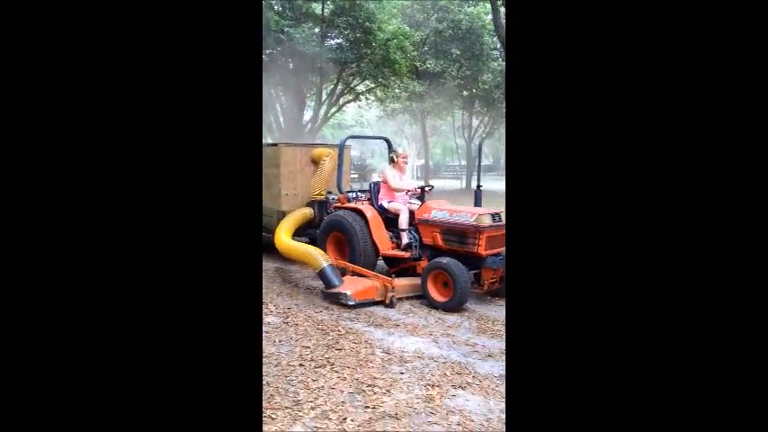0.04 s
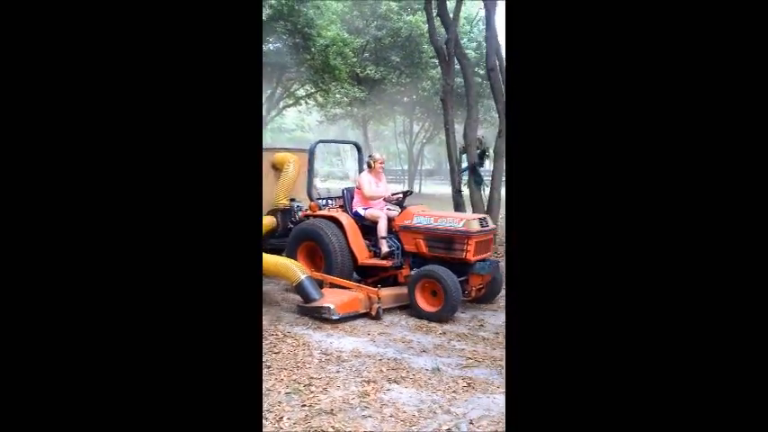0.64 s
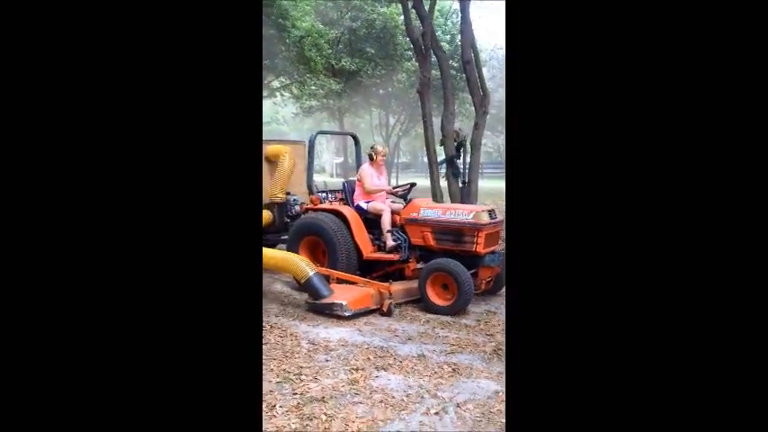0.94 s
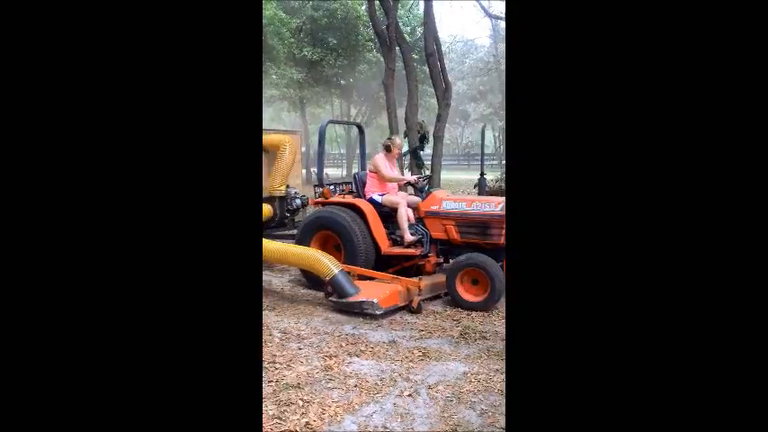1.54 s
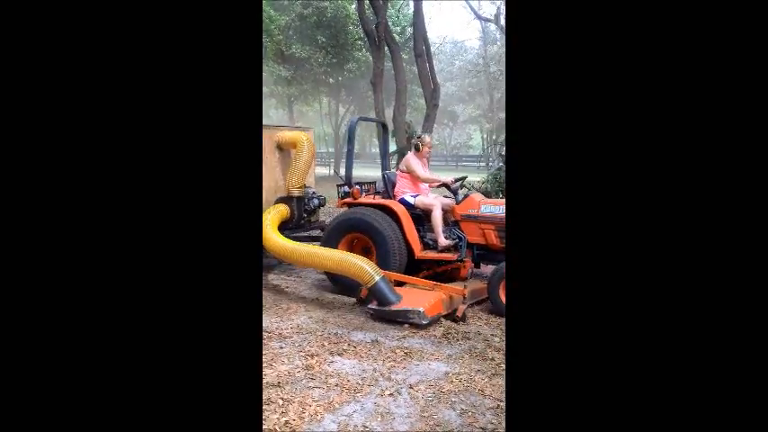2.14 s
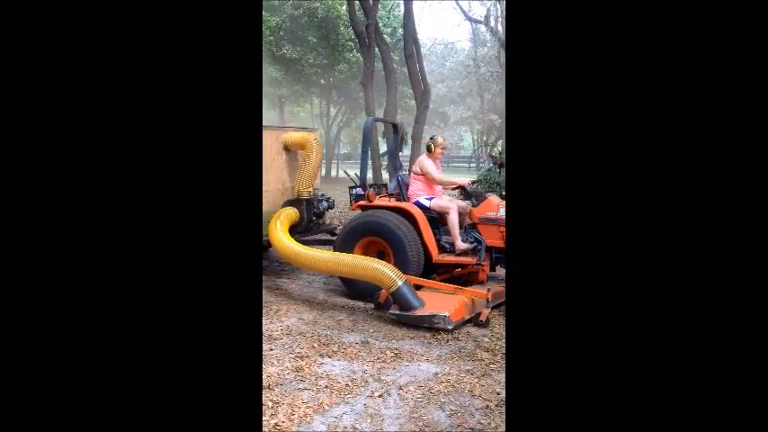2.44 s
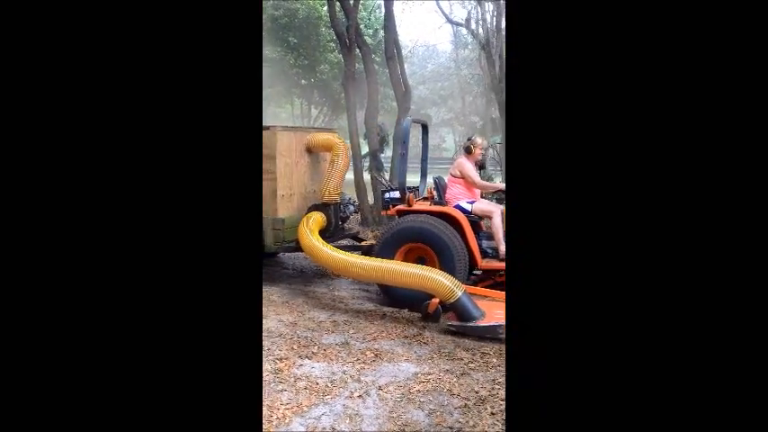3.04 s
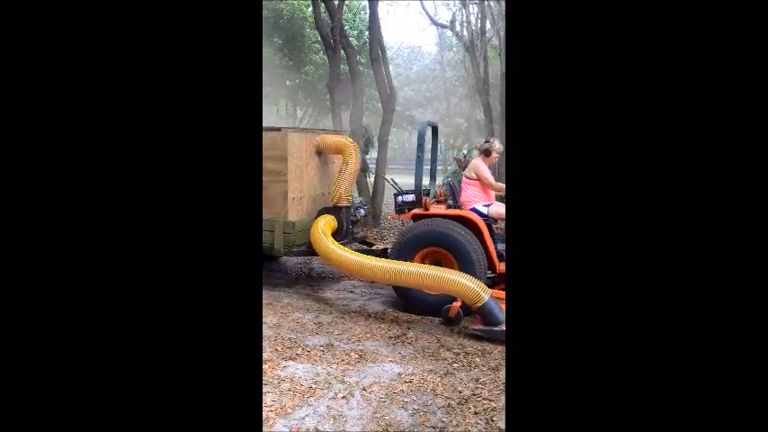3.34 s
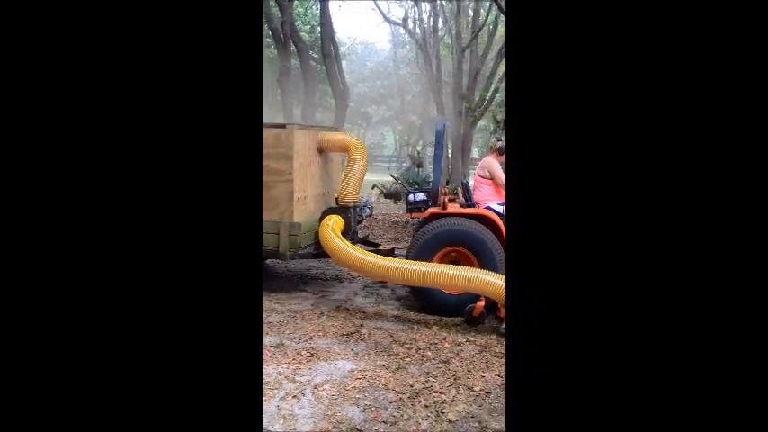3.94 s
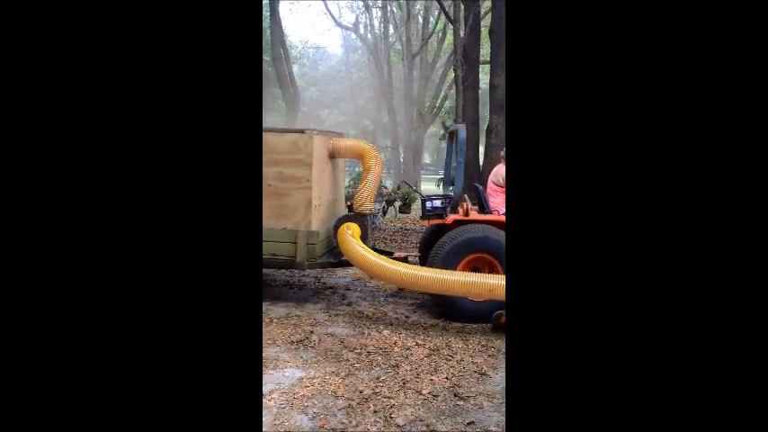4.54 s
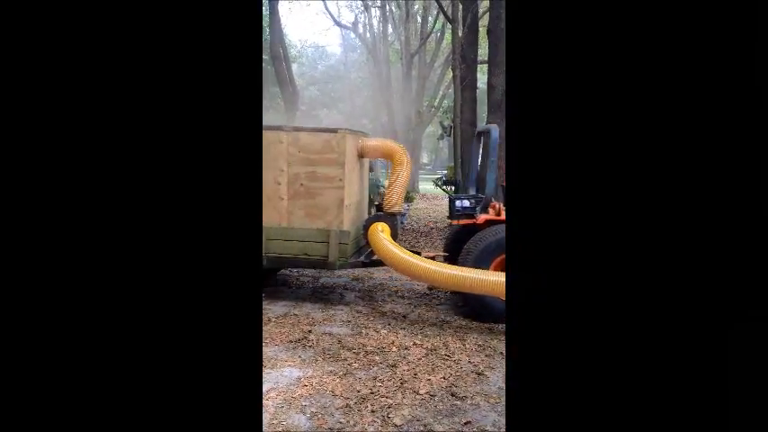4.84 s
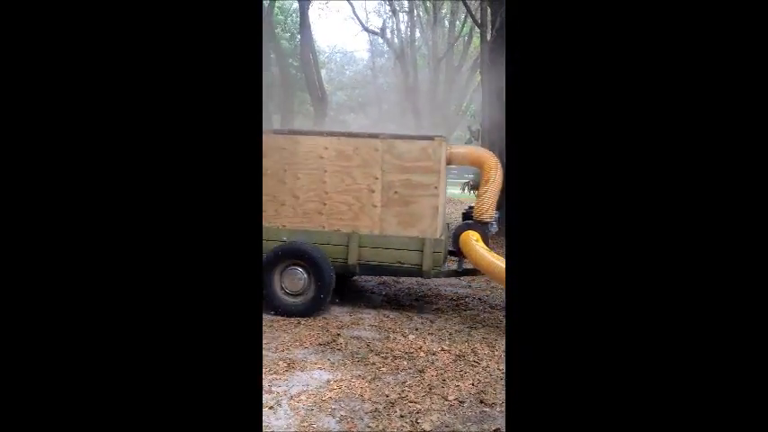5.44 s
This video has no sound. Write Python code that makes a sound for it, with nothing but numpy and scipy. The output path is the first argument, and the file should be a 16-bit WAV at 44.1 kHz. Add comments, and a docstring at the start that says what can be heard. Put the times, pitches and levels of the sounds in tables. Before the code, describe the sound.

From the start a leaf vacuum towed by a slow diesel tractor gives a loud, low, steady hum, heard close by outdoors. Beneath it run the rapid exhaust puffs and valve rattle of its small engine, the tractor's diesel clatter, a low rumble and air rushing through a hose with fine ticks of leaf bits. Around 2 seconds the puffs and air swell while the hum dips, and the pitch sags very slightly. At about 2.5 seconds the mower deck passes, with a brief fizzing rasp of dry leaves and a hollow boom that stays underneath afterwards. The clatter eases around 3.4 seconds as the hum recovers. Near 4.7 seconds the puffs and air swell again and the hum fades deeply. It comes back by about 5.3 seconds, with both engines still running at the end.

```python
"""A diesel tractor crawls past, towing a leaf vacuum with its own one-cylinder engine.
From the start the four-blade impeller hums loudly over exhaust puffs, diesel clatter and hose air.
Near 2 s puffs and air swell, while the hum fades against its ground reflection.
At 2.45 s the mower deck passes, booming, with dry leaves rasping under it.
Near 4.7 s puffs and air swell again; the hum fades deeply, then comes back."""
import sys
import numpy as np
from scipy import signal
from scipy.fft import rfft, irfft
from scipy.io import wavfile
from scipy.ndimage import uniform_filter1d, minimum_filter1d

SR = 44100
rng = np.random.default_rng(int(sys.argv[2]) if len(sys.argv) > 2 else 0)


def put_to_file(sound):
    """Save the sound as 16-bit audio at rate SR, in the file named by the first command-line argument."""
    columns = np.atleast_2d(sound).T  # one column per channel
    safe = np.clip(columns, -1, 1)
    whole_steps = np.round(safe * 32767)
    wavfile.write(sys.argv[1], SR, whole_steps.astype(np.int16))


N = 242550
TIME = np.arange(N) / SR
FREQ = np.fft.rfftfreq(N, 1 / SR)

DECK_AT_S, DECK_REACH_S = 2.45, .22  # closest approach; time from there to half power

# ringing of engine blocks and panels: (frequency [Hz], width [Hz], relative level [dB])
BLOCK_MODES = [(1030, 83, -6.5), (1140, 150, -1.5), (1287, 118, 0), (1454, 103, -4), (1663, 100, -6),
               (1785, 75, -3), (1937, 130, -4), (2160, 70, -9.5), (2360, 255, -6.5), (2705, 85, -11.5),
               (2910, 150, -10)]
# low drone of both engines, thinning briefly as the tractor moves off: (time [s], gain [dB])
DRONE_GAIN = [(0, -0.3), (1.0, 1), (2.3, 1.2), (3.2, -2), (5.5, .4)]


def amp(db):
    """Decibels to gain."""
    return 10 ** (np.asarray(db) / 20)


def unit(x):
    """Scale to rms 1."""
    return x / np.sqrt(np.mean(x ** 2) + 1e-20)


def envelope(points):
    """Gain over time from (time [s], level [dB]) points."""
    time_s, db = np.transpose(points)
    return amp(np.interp(TIME, time_s, db))


def spectrum(points):
    """Gain over frequency from (frequency [Hz], level [dB]) points."""
    hz, db = np.transpose(points)
    return amp(np.interp(np.log(FREQ + 1), np.log(hz), db))


def resonances(modes):
    """Gain over frequency of steep-sided resonances."""
    return np.sqrt(sum(amp(db) ** 2 / (1 + 2 * ((FREQ - hz) / width_hz) ** 2) ** 2
                       for hz, width_hz, db in modes))


def colour(x, gain):
    """Filter x, then scale to rms 1."""
    return unit(irfft(rfft(x) * gain, N))


def noise(gain):
    """Filtered noise, rms 1."""
    return colour(rng.standard_normal(N), gain)


def drift(hz):
    """Random wander up to about hz, rms 1."""
    return noise(np.exp(-(FREQ / hz) ** 2) * (FREQ > 0))


def tone(turns, db):
    """Sine of rms level db, random start phase."""
    return np.sqrt(2) * amp(db) * np.cos(2 * np.pi * (turns + rng.random()))


def engine_lines(turns, orders, waver_db, waver_hz, smear_turns):
    """Engine orders, wavering in phase and level as their paths among the trees change."""
    total = np.zeros(N)
    for order, db in orders:
        phase = order * turns + smear_turns * drift(waver_hz)
        total += tone(phase, db + waver_db * np.tanh(drift(waver_hz)))
    return total


def bursts(turns, decay_turns, floor):
    """Noise that flares once a turn above a steady floor."""
    return (floor + np.exp(-(turns % 1) / decay_turns)) * rng.standard_normal(N)


def power_peak(at_s, reach_s):
    """Power over time: 1 at at_s, half at reach_s to either side."""
    return 1 / (1 + ((TIME - at_s) / reach_s) ** 2)


def swells(floor_db, first_db, second_db):
    """Gain: a steady floor with two swells."""
    first = amp(first_db) ** 2 * power_peak(at_s=2.13, reach_s=.63)
    second = amp(second_db) ** 2 * power_peak(at_s=4.75, reach_s=.39)
    return np.sqrt(amp(floor_db) ** 2 + first + second)


def ground_fade(order):
    """Gain of one tone, dipping where its ground reflection cancels it."""
    # cancellations: (order [x cycle rate], time [s], half-width [s], depth [dB])
    fades = [(8, 2.03, 0.62, 8), (8, 4.67, 0.57, 23), (16, 0, 1.0, 6.5), (16, 2.5, 1.57, 20),
             (16, 4, 0.3, 15), (16, 5.5, 0.26, 25), (19, 0.4, 1.5, 13), (19, 3, 1.34, 17),
             (24, 0.3, 1.34, 16), (24, .97, 0.26, 20), (24, 2.95, 0.73, 5.5), (24, 4.38, 0.38, 7),
             (24, 5.5, .16, 24.5)]
    power_dips = [1 - (1 - amp(-depth_db) ** 2) * np.exp(-((TIME - at_s) / width_s) ** 2)
                  for k, at_s, width_s, depth_db in fades if k == order]
    return np.sqrt(np.prod(power_dips, axis=0))


def impeller(turns):
    """Four blades at two shaft turns a cycle hum at order 8; hum and overtones flutter slightly."""
    # impeller and engine overtones: (order [x cycle rate], unfaded level [dB])
    overtones = [(16, -28), (19, -27), (24, -22)]
    hum = ground_fade(order=8) * tone(8 * turns, db=-7.7 + .3 * drift(hz=22))
    return hum + sum(ground_fade(k) * tone(k * turns, db + drift(hz=15)) for k, db in overtones)


def rattle(turns):
    """Valves and piston repeat one rattle every cycle; its shape slowly changes."""
    size = 1500
    shapes = rng.standard_normal((3, size))
    grid_turns = np.arange(size) / size
    return unit(sum(drift(hz=.78) * np.interp(turns % 1, grid_turns, shape) for shape in shapes))


def vacuum_engine(turns):
    """One firing a cycle: low drone, comb of lines, valve rattle and a gas puff through the muffler."""
    # clean exhaust drone: (order [x cycle rate], relative level [dB])
    drone_orders = [(2, -77), (3, -60), (4, -37), (5, -28.5), (6, -37), (7, -46)]
    # higher, wavering lines: (order [x cycle rate], relative level [dB])
    comb_orders = [(10, -41), (12, -52), (17, -38.5), (18, -46), (20, -48), (21, -40.5), (22, -37.5),
                   (23, -36), (25, -44), (26, -44), (27, -41), (28, -45.5), (32, -45.5), (34, -44.5),
                   (40, -42.5), (42, -49), (43, -51), (46, -51), (48, -57), (51, -51), (60, -45.5),
                   (61, -47.5), (62, -48), (63, -53)]
    # muffler resonances: (frequency [Hz], width [Hz], relative level [dB])
    muffler_modes = [(492, 55, -6), (561, 47, 2.5), (625, 72, 1), (710, 67, 1), (807, 90, -1.5)]
    drone = engine_lines(turns, drone_orders, waver_db=2, waver_hz=.71, smear_turns=.015)
    comb = engine_lines(turns, comb_orders, waver_db=5, waver_hz=1.22, smear_turns=.1)
    valves = amp(-32) * colour(rattle(turns), resonances(BLOCK_MODES))
    gas = bursts(turns, decay_turns=.14, floor=1.05)
    puffs = colour(gas, resonances(muffler_modes))
    puffs *= swells(floor_db=-25.5, first_db=-24, second_db=-24)
    return drone * envelope(DRONE_GAIN) + amp(-.7) * comb + valves + puffs


def diesel():
    """Three cylinders, four-stroke: a lumpy drone, and a knock into the block at each firing."""
    # drone lines: (order [x cycle rate], relative level [dB])
    drone_orders = [(3, -55), (6, -35.5), (9, -34), (11, -38.5), (12, -40.5), (15.5, -46)]
    # clatter swells and drops as the bonnet goes by: (time [s], relative level [dB])
    clatter_level = [(0, -23.5), (1.3, -22.5), (2.5, -21), (3.4, -27), (4.85, -23), (5.5, -25.5)]
    cycle_hz = 22.62 * (1 + .003 * drift(hz=1.55))
    turns = np.cumsum(cycle_hz) / SR
    drone = engine_lines(turns, drone_orders, waver_db=6, waver_hz=5.3, smear_turns=.093)
    knocks = bursts(3 * turns, decay_turns=.25, floor=1.6)
    clatter = amp(-2) * colour(knocks, resonances(BLOCK_MODES))
    return drone * envelope(DRONE_GAIN) + clatter * envelope(clatter_level)


def hose_air():
    """Turbulent air in the hose, with bits of leaf ticking along its wall."""
    # rushing air: (frequency [Hz], relative density [dB])
    rush_spectrum = [(100, -31), (400, 6.5), (900, 7), (1600, 5), (2600, 2.5), (3600, 2), (5000, 0.66),
                     (6500, -1), (8000, -7), (9300, -11.5), (10800, -13.5), (12500, -11.5), (15000, -13.5)]
    # hose and fan housing resonances: (frequency [Hz], width [Hz], level re rush [dB])
    hose_modes = [(3370, 120, 1), (3850, 100, 2), (4300, 140, -2), (4600, 110, -8), (4830, 110, -3)]
    ticks_per_s = 700
    ticks = rng.uniform(-1, 1, N) * (rng.random(N) < ticks_per_s / SR)
    flow = rng.standard_normal(N) + amp(-13) * unit(ticks)
    rush = colour(flow, spectrum(rush_spectrum) * np.sqrt(1 + resonances(hose_modes) ** 2))
    flutter = amp(.5 * drift(hz=11))
    return rush * flutter * swells(floor_db=-26, first_db=-23.5, second_db=-28)


def rumble():
    """Steady low roar of both machines and the wooden box."""
    # roar: (frequency [Hz], relative density [dB])
    roar_spectrum = [(20, -38), (70, -35), (100, -21), (130, -8.5), (175, -4), (215, -6), (250, -2.5),
                     (290, -14.5), (420, -25), (2000, -56)]
    return amp(-28.5) * noise(spectrum(roar_spectrum))


def deck_boom():
    """Churned air booms in the mower deck; it grows as the deck nears, then holds."""
    # hollow deck resonances: (frequency [Hz], width [Hz], relative level [dB])
    deck_modes = [(256, 28, -1.5), (293, 46, -4), (349, 36, -7), (404, 60, -11)]
    hold_db, rise_db_per_s = -29, 2
    ahead_s = np.maximum(DECK_AT_S - TIME, 0)
    return noise(resonances(deck_modes)) * amp(hold_db - rise_db_per_s * ahead_s)


def leaves():
    """Dry leaves fizz and rasp under the mower deck, loudest as it goes by."""
    # swept leaves: (frequency [Hz], relative density [dB])
    fizz_spectrum = [(1000, -14), (3000, -8), (7000, 6), (10000, -3), (15000, -7)]
    # leaves on the deck's steel: (frequency [Hz], width [Hz], relative level [dB])
    rasp_modes = [(830, 100, -1), (1950, 330, 0)]
    fizz = amp(-34.6) * noise(spectrum(fizz_spectrum))
    flutter = amp(1.1 * drift(hz=20))
    rasp = amp(-28.5) * noise(resonances(rasp_modes))
    return (fizz + rasp) * flutter * np.sqrt(power_peak(DECK_AT_S, DECK_REACH_S))


def scene():
    """Mono mix. Impeller and vacuum engine share one shaft, whose speed trembles slightly."""
    sag_share, sag_at_s, sag_time_s = .002, 2.2, .7  # pitch sags as the rig goes by
    sag = 1 - sag_share * np.tanh((TIME - sag_at_s) / sag_time_s)
    cycle_hz = 29.32 * sag * (1 + .0006 * drift(hz=11.2))
    turns = np.cumsum(cycle_hz) / SR  # one turn = one four-stroke cycle
    vacuum = impeller(turns) + vacuum_engine(turns) + hose_air()
    return (vacuum + diesel() + leaves() + rumble() + deck_boom())[None]


def record(dry):
    """10 ms peak limiter, then a steep low-pass."""
    ceiling, window_samples, cutoff_hz = .97, 441, 15330
    gain = minimum_filter1d(ceiling / np.maximum(abs(dry), ceiling), size=window_samples)
    limited = dry * uniform_filter1d(gain, size=window_samples)
    lowpass = signal.firwin(1023, cutoff_hz, window=("kaiser", 9), fs=SR)
    return signal.oaconvolve(limited, lowpass[None], "same")


dry = scene()
out = record(dry)
put_to_file(out)
```